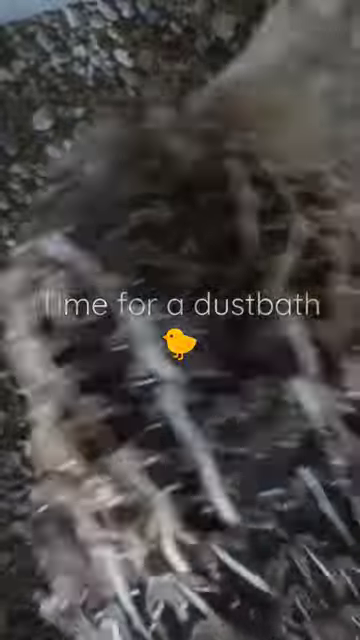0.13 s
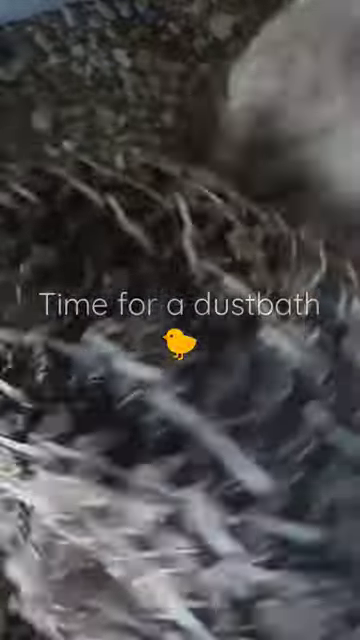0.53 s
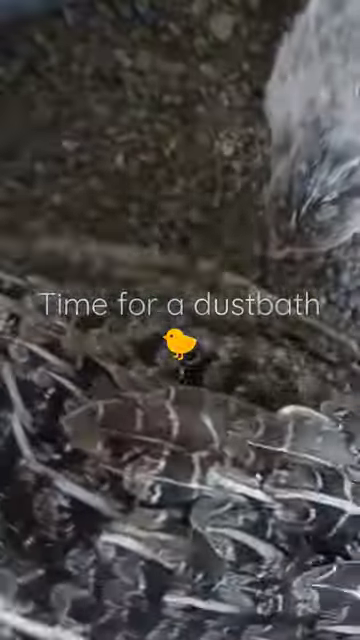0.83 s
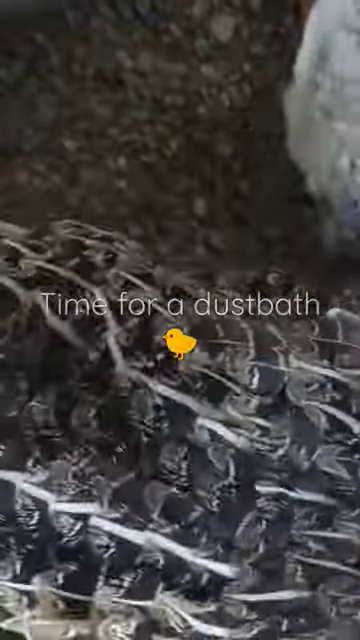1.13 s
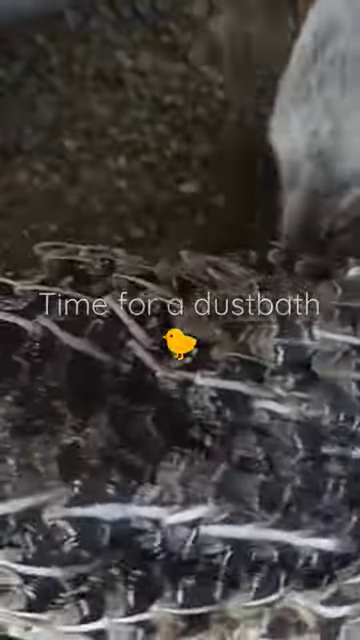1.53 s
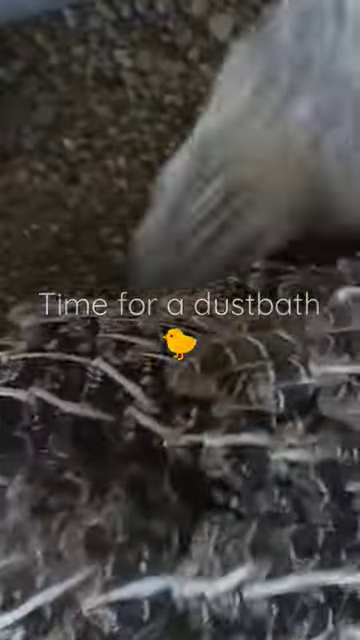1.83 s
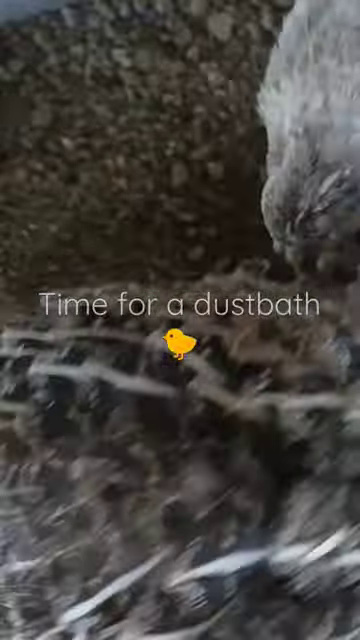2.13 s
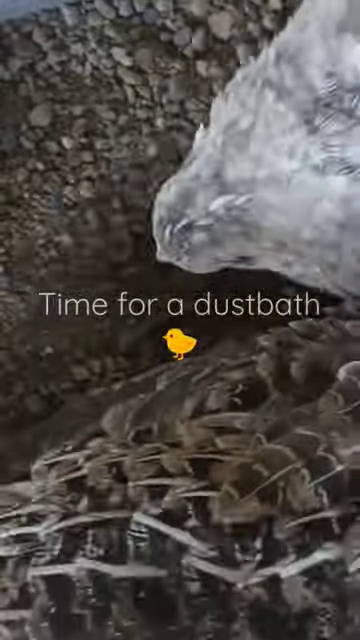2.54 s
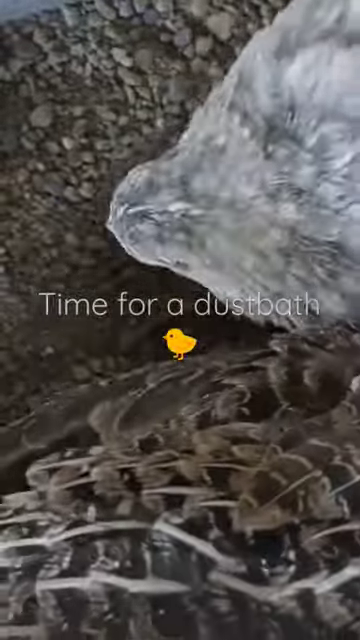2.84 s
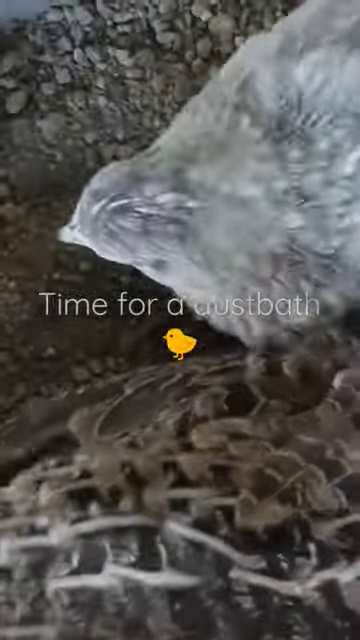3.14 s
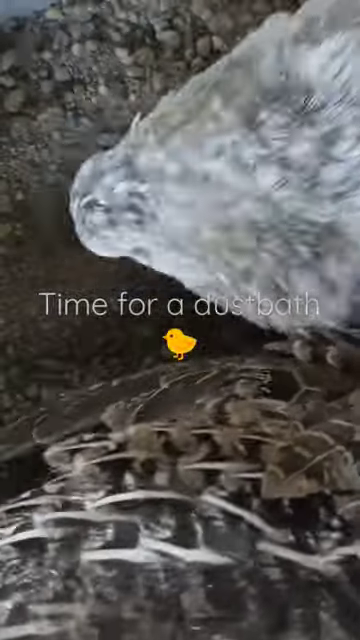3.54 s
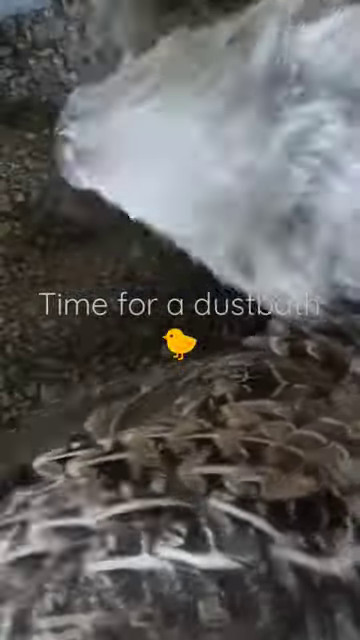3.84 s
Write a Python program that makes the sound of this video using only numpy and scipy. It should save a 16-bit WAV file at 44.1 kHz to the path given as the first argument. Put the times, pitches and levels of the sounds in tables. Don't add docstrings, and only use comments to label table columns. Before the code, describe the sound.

Two quail dust-bathe in dry grit, close to the microphone: gravelly scratches in uneven bursts, stone clicks and dull foot knocks, growing strongest near the end, with faint peeps and quiet outdoor air behind.

```python
import sys
import numpy as np
from scipy import signal
from scipy.io import wavfile
from scipy.ndimage import uniform_filter1d

SR = 44100
rng = np.random.default_rng(int(sys.argv[2]) if len(sys.argv) > 2 else 0)


def log_audio(samples):
    frames = np.atleast_2d(samples).T
    limited = np.clip(frames, -1, 1)
    pcm = np.round(limited * 32767).astype(np.int16)
    wavfile.write(sys.argv[1], SR, pcm)


def nominal_scale(level):
    x = np.asarray(level, float) / 20
    return 10 ** x


N = 176400


def read(points, hz):
    f, value = np.transpose(points)
    return np.interp(np.log(hz + 1), np.log(f + 1), value)


def evened(x):
    return x / np.sqrt(np.mean(x ** 2) + 1e-20)


def resonate(x, hz, width):
    return signal.lfilter(*signal.iirpeak(hz, hz / max(width, 1), SR), x)


def curve(table, axis):
    return np.interp(np.arange(N) / SR, [r[0] for r in table], [r[axis] for r in table])


def colour(gain_db):
    log = np.log(nominal_scale(np.concatenate([gain_db, gain_db[-2:0:-1]])))
    h = np.fft.ifft(np.exp(log - 1j * signal.hilbert(log).imag)).real[:1024]
    return h / np.linalg.norm(h)


# (frequency [Hz], level [dB])
AIR_TONE = [(45, -30), (150, -3.5), (300, -12.5), (560, -17), (2000, -25), (15400, -32.5), (16000, -51)]
# (frequency [Hz], likeness [0-1])
AIR_LIKENESS = [(60, 0.98), (200, 0.72), (400, 0.43), (1400, 0.043)]


def air():
    frames, hz = N // 256 + 5, np.fft.rfftfreq(1024, 1 / SR)
    a, b, c, d, patches = rng.standard_normal((frames, 513, 5)).T
    patches = uniform_filter1d(patches, 12, axis=0)
    patches = evened(uniform_filter1d(patches, 12, axis=1))
    same = np.clip(read(AIR_LIKENESS, hz), -1, 1)[:, None]
    left = a + 1j * b
    right = same * left + np.sqrt(1 - same ** 2) * (c + 1j * d)
    z = np.array([left, nominal_scale(-1.0) * right])
    z *= nominal_scale(read(AIR_TONE, hz)[:, None] + 4.1 * patches)
    wash = signal.istft(z, nperseg=1024, noverlap=768)[1][:, :N]
    return nominal_scale(-69.5) * evened(wash)


# (time [s], level [dB])
HUM_LEVEL = [(.14, -66), (.3, -60), (.42, -62.5), (.7, -58), (.85, -65.5), (.95, -54.5), (1.17, -64),
             (1.25, -74.5), (2.78, -77), (2.85, -60), (2.92, -94)]
# (start [s], end [s])
WHINE_TIMES = [
    (1.1, 1.48),
    (2.35, 2.9),
]


def hum():
    t = np.arange(N) / SR
    tone, low, whine = rng.standard_normal((3, 2, N))
    spread = np.array([[.2], [-.2]])
    tone = tone[:1] + spread * tone[1:]
    low = low[:1] + spread * low[1:]
    tone = evened(resonate(resonate(tone, 137.9, 17.6), 137.9, 39.0)) * nominal_scale(curve(HUM_LEVEL, axis=1))
    low = evened(resonate(resonate(low, 85, 41.0), 85, 50.0)) * nominal_scale(-70 - 1.94 * t)
    whine = evened(resonate(resonate(whine, 1577, 96), 1577, 300.0)) * nominal_scale(-78.5)
    heard = sum(1. * ((t > start) & (t < end)) for start, end in WHINE_TIMES)
    whine *= uniform_filter1d(heard, size=3000)
    return (tone + low) * nominal_scale(np.array([[.6], [-.6]])) + whine


# (start [s], length [s], first pitch [Hz], middle pitch [Hz], last pitch [Hz], level [dB])
PEEP_CALLS = [(0.252, 0.042, 2230, 2700, 2580, -62), (0.441, 0.036, 2720, 2800, 2570, -68),
              (0.458, 0.052, 2430, 2220, 2340, -66.5), (1.874, 0.028, 2810, 2670, 2400, -77),
              (2.036, 0.025, 1910, 2010, 2060, -62.5), (2.475, 0.03, 2760, 2720, 2560, -68),
              (2.494, 0.076, 2350, 2180, 2360, -73), (3.032, 0.03, 2784, 2760, 2680, -60),
              (3.071, 0.023, 2720, 2740, 2720, -76), (3.154, 0.017, 1610, 1410, 1370, -60),
              (3.472, 0.048, 2770, 2080, 1940, -66), (3.795, 0.09, 1162, 1060, 1080, -78),
              (3.811, 0.037, 8600, 8620, 8500, -65)]


def peeps():
    out = np.zeros(N)
    for start, length, hz0, hz1, hz2, db in PEEP_CALLS:
        u = np.arange(0, length, 1 / SR) / length
        wobble = 1 + .006 * evened(uniform_filter1d(rng.standard_normal(4000), 150))[:len(u)]
        slide = np.interp(u, (0, .6, 1), (hz0, hz1, hz2))
        hz = uniform_filter1d(slide, size=300, mode="nearest") * wobble
        strength = nominal_scale(db) * wobble ** 70 * np.sin(np.pi * u) ** 0.54
        at = round(start * SR)
        out[at:at + len(u)] += strength * np.sin(2 * np.pi * np.cumsum(hz) / SR)
    return np.array([out * nominal_scale(9), np.roll(out, 4)])


# (time [s], level [dB], ring [Hz])
FOOT_KNOCKS = [(0.514, -52, 780), (0.57, -51, 867), (0.635, -60, 610), (0.651, -45, 866),
               (0.678, -38.5, 715), (0.691, -47, 880), (0.73, -52, 724), (0.74, -49, 767),
               (0.778, -51.5, 805), (0.997, -47, 930), (1.032, -56, 720), (1.621, -31.5, 1143),
               (1.764, -39.5, 832), (1.917, -45.5, 697), (2.097, -52.5, 597), (2.509, -53, 606),
               (2.52, -51.5, 590), (2.566, -56, 650), (3.117, -44.5, 754), (3.326, -52, 897),
               (3.681, -46.5, 791)]
# (time [s], level [dB], ring [Hz])
STONE_KNOCKS = [
    (1.6219, -22, 2430),
    (2.0053, -28, 2400),
    (2.5666, -23, 2300),
    (3.2316, -33, 3240),
    (3.613, -30, 3080),
]


def knocks():
    out, t = np.zeros(N), np.arange(3000) / SR
    for (s, db, hz), u in zip(FOOT_KNOCKS + STONE_KNOCKS, rng.random((40, 2))):
        partner_hz = hz * (.8 + .4 * u[0])
        pair = np.sin(2 * np.pi * hz * t) + .35 * np.sin(2 * np.pi * (partner_hz * t + u[1]))
        rise = 1 - np.exp(-t / .0015)
        fade = nominal_scale(db + 0.5 - 60 * t * hz / (800 * 0.044))
        at = round(s * SR)
        out[at:at + 3000] += rise * fade * pair
    return np.array([out * nominal_scale(3.9), np.roll(out, 8) * nominal_scale(-2.0)])


# (time [s], level [dB], ring [Hz])
GRAIN_TICKS = [(0.6713, -37, 5300), (0.6776, -26.5, 5140), (0.6902, -28, 6160), (0.7397, -44, 5350),
               (0.7523, -30.5, 5940), (0.7594, -36, 6650), (1.233, -42, 6150), (1.541, -48, 5440),
               (1.5558, -36.5, 5750), (1.588, -40, 4700), (1.749, -34.5, 5030), (1.7634, -26, 5360),
               (1.7846, -34, 5640), (2.0957, -24, 7200), (2.567, -27, 4750), (2.618, -44, 5070),
               (2.6738, -40, 5250), (2.8759, -52, 5700), (2.9807, -50.5, 5640), (3.1183, -26.5, 3810),
               (3.1777, -38, 6380), (3.2311, -21, 5000), (3.5634, -39, 6000), (3.6132, -21, 4200),
               (3.6134, -11.5, 5520), (3.6415, -29, 6300), (3.6805, -19.5, 5350), (3.7184, -36.5, 5070),
               (3.728, -35, 5200), (3.7624, -31, 7200), (3.8074, -34, 7500), (3.9899, -41.5, 3750)]


def ticks():
    raw, rings, t = np.zeros((2, N)), np.zeros((2, N)), np.arange(900) / SR
    tick_s, ring_s, ring_db = .012, .01, 6.5
    rise = np.minimum(t / .0006, 1)
    for (s, db, hz), spit, u in zip(GRAIN_TICKS, rng.standard_normal((40, 2, 900)), rng.random(40)):
        side = nominal_scale(db - 6.5 + np.array([1, -1]))
        ring = rise * nominal_scale(ring_db - 60 * t / ring_s) * np.sin(2 * np.pi * hz * t)
        for ch, lag in enumerate((0, int(24 * u) - 12)):
            at = round(s * SR) + lag
            room = len(raw[ch, at:at + 900])
            noise = rise * nominal_scale(-60 * t / tick_s) * (spit[0] + .6 * spit[1] * ch)
            raw[ch, at:at + 900] += (side[ch] * noise)[:room]
            rings[ch, at:at + 900] += (side[ch] * ring)[:room]
    return raw, rings


def grainy():
    grains_per_s, spread_db, grain_s, dust = 700, 4, .0006, 1.9
    sizes = nominal_scale(spread_db * np.minimum(rng.exponential(1, N), 2.5))
    hits = sizes * (rng.random(N) < grains_per_s / SR)
    k = np.exp(-1 / (grain_s * SR))
    return evened(dust + evened(signal.lfilter([1], [1, -k], hits)))


# (time [s], grit level [dB], bed thud over grit [dB])
SHUFFLING = [(.14, -79, 4), (.34, -71, 15.5), (.41, -78, 4), (.47, -76, 17), (.63, -62.5, 8),
             (.82, -70, 13), (.87, -67.5, -28), (1.2, -76, -7), (1.3, -101.5, 20), (2.2, -60.5, -23),
             (2.35, -93, -16), (2.47, -65.5, -1), (2.9, -82.5, -7), (3.31, -59, 1.5), (3.37, -88, 14),
             (3.49, -99, -18), (3.55, -61, 4), (3.85, -60.5, -30)]


def shuffling(grains, noise):
    level_db = curve(SHUFFLING, axis=1)
    rub = np.array([noise[0], .5 * np.roll(noise[0], 9) + 0.65 * noise[1]])
    lumps = nominal_scale(2.5 * evened(uniform_filter1d(rng.standard_normal(N), size=700)))
    ports = nominal_scale(level_db) * grains * rub * lumps
    modes = len(BED_RINGS)
    push_db = level_db + curve(SHUFFLING, axis=2) + 11.5 - 2.9 * np.arange(modes)[:, None]
    return ports, nominal_scale(push_db) * rng.standard_normal((modes, N))


def touch(ports, bed, grains, noise, u, s, db, thud_db, up, down):
    part = slice(max(round((s - up) * SR), 0), min(round((s + down) * SR), N - 40))
    dt = np.arange(N)[part] / SR - s
    shape = nominal_scale(db - 60 * np.where(dt < 0, -dt / up, dt / down)) * grains[part]
    lag, pan = int(32 * u[0]), nominal_scale(2 * u[1] - 1.5)
    same = .55
    left = shape * noise[3, part]
    right = same * left + np.sqrt(1 - same ** 2) * shape * noise[1, part]
    ports[0, part.start + 12:part.stop + 12] += left * pan
    ports[1, part.start + lag:part.stop + lag] += right / pan
    bed[:, part] += left * nominal_scale(thud_db + 20.5 - 10 * u[3:, None])
    return lag, pan


# (peak [s], level [dB], bed thud over grit [dB], swell [s], dying [s])
GRIT_STROKES = [(0.139, -49.5, 7, 0.049, 0.05), (0.2137, -41, -7.5, 0.075, 0.06),
                (0.3803, -46, -35, 0.023, 0.092), (0.678, -29, -12, 0.069, 0.2),
                (0.7543, -31, -15.5, 0.09, 0.087), (0.7975, -40, -10, 0.051, 0.064),
                (1.0, -57.5, 10, 0.24, 0.42), (1.0812, -41.5, -8, 0.1, 0.032),
                (1.2385, -44, -11, 0.02, 0.1), (1.464, -45.5, -12.5, 0.12, 0.15),
                (1.544, -36, -18.5, 0.031, 0.19), (1.619, -40, 3, 0.057, 0.15),
                (1.711, -34.5, -21.5, 0.034, 0.23), (1.7642, -27.5, -9, 0.015, 0.13),
                (1.92, -42, 1.5, 0.1, 0.16), (2.0068, -34.5, -6.5, 0.033, 0.18),
                (2.0947, -30.5, -21.5, 0.025, 0.14),
                (2.5014, -56.5, 7, 0.033, 0.16), (2.5677, -24, -5.5, 0.013, 0.13),
                (2.6476, -32, -8, 0.014, 0.15), (2.6746, -28, -11.5, 0.028, 0.2),
                (2.8384, -50.5, -29, 0.0097, 0.47), (3.114, -31, 4.5, 0.028, 0.11),
                (3.178, -44.5, -1, 0.021, 0.041), (3.228, -20.5, -13, 0.08, 0.12),
                (3.522, -49.5, 1.5, 0.035, 0.3), (3.5643, -35.5, -12, 0.012, 0.12),
                (3.6107, -18, -14, 0.059, 0.17), (3.68, -29.5, -7.5, 0.05, 0.081),
                (3.722, -30.5, -17.5, 0.11, 0.12), (3.765, -31, -45, 0.016, 0.029),
                (3.811, -34.5, -47, 0.013, 0.11), (3.926, -38, -50, 0.057, 0.034)]


def strokes(ports, bed, grains, noise, chances):
    for s, db, thud_db, up, down in GRIT_STROKES:
        touch(ports, bed, grains, noise, next(chances), s, db - 13, thud_db, up + 0.00068, down + 0.015)


# (time [s], level [dB], bed thud over crack [dB])
STONE_CRACKS = [(0.7391, -33, -27), (1.3847, -49, -51), (1.6198, -31.5, -0.5), (1.8467, -46, -30),
                (2.0048, -24.5, -51), (2.0234, -27, -26), (2.1612, -36, -22), (2.1993, -43, -35),
                (2.5757, -24, -9), (2.6481, -23, -43), (2.8753, -42, -21), (3.2310, -16, -19),
                (3.61, -26, -26), (3.614, -19.5, -59), (3.625, -18, -53), (3.6802, -33.5, -11)]


def stones(ports, bed, noise, chances):
    rings, t = np.zeros((2, N)), np.arange(1500) / SR
    for s, db, thud_db in STONE_CRACKS:
        s, db, u = s + 0.0012, db - 6.5, next(chances)
        lag, pan = touch(ports, bed, np.ones(N), noise, u, s, db, thud_db, .002, 0.016)
        hz = 5300 * (.85 + .3 * u[2])
        ring = nominal_scale(db - 11 - 60 * t / .02) * np.sin(2 * np.pi * hz * t)
        at = round(s * SR)
        rings[0, at + 12:at + 1512] += ring * pan
        rings[1, at + lag:at + lag + 1500] += ring / pan
    return rings


def patchy(x):
    z = signal.stft(x, nperseg=256, noverlap=192)[2]
    field = uniform_filter1d(rng.standard_normal(z.shape[1:]), size=3, axis=0)
    field = evened(uniform_filter1d(field, size=6, axis=1))
    return signal.istft(z * nominal_scale(2.8 * field), nperseg=256, noverlap=192)[1][:, :N]


# (frequency [Hz], level [dB])
GRIT_TONE = [(710, -21.5), (1200, -18), (3320, -4), (3740, -8.5), (5350, -9), (13600, -3.5), (15000, -2),
             (16000, -34)]
# (frequency [Hz], width [Hz], level [dB])
GRIT_PEAKS = [(5750, 3900, 14.5), (15300, 1100, 9.5)]
# (frequency [Hz], width [Hz], level [dB])
BED_RINGS = [(613, 162, 0.5), (770.5, 275, 4), (1090, 486, -0.5), (1583, 395, -1), (2400, 780, 0),
             (3953, 480, 0)]


def grit():
    grains, noise = grainy(), rng.standard_normal((4, N))
    ports, bed = shuffling(grains, noise)
    chances = iter(rng.random((80, 3 + len(BED_RINGS))))
    strokes(ports, bed, grains, noise, chances)
    cracks = stones(ports, bed, noise, chances)
    spits, pings = ticks()

    hz = np.fft.rfftfreq(4096, 1 / SR)
    gain_db = read([(300, -135.5)] + GRIT_TONE + [(16400, -58)], hz)
    gain_db += sum(db / (1 + (2 * (hz - f) / w) ** 2) for f, w, db in GRIT_PEAKS)
    tops_db = (0, -4.5)
    hiss = np.array([signal.oaconvolve(x, colour(gain_db + top * (hz / 15000) ** 4))[:N]
                     for x, top in zip(ports + spits, tops_db)])

    bed = signal.sosfilt(signal.butter(4, 500, "high", fs=SR, output="sos"), bed)
    thud = np.zeros(N)
    for push, (f, w, db) in zip(bed, BED_RINGS):
        thud += nominal_scale(db) * resonate(resonate(np.roll(push, -70), f, w), f, 1.19 * w)
    thud = np.array([thud, np.roll(thud, 7) * nominal_scale(-1.3)])
    return patchy(hiss + thud) + cracks + pings


def scene():
    return grit() + knocks() + peeps() + air() + hum()


def band_limit(x):
    return signal.sosfilt(signal.butter(12, 16810, fs=SR, output="sos"), x)


def record(dry):
    start_s, fade_s = 0.1318, 0.019
    fade_in = np.clip((np.arange(N) / SR - start_s) / fade_s, 0, 1)
    return band_limit(dry * fade_in)


dry = scene()
out = record(dry)
log_audio(out)
```